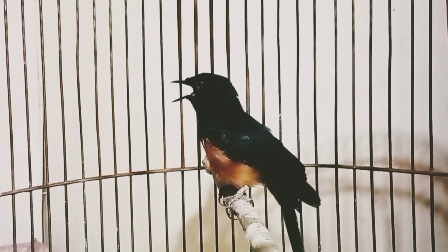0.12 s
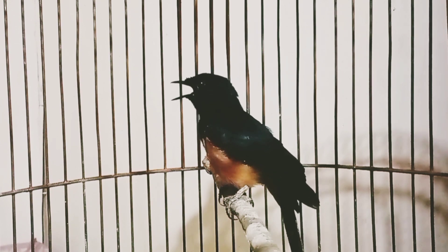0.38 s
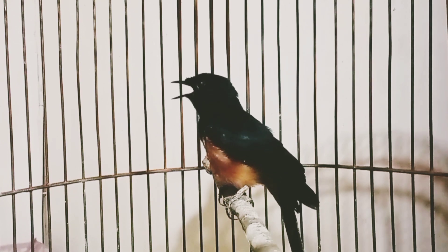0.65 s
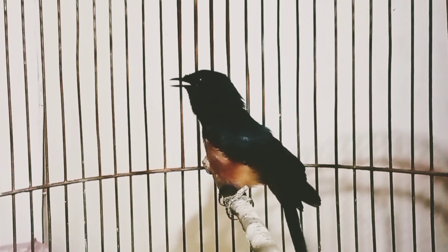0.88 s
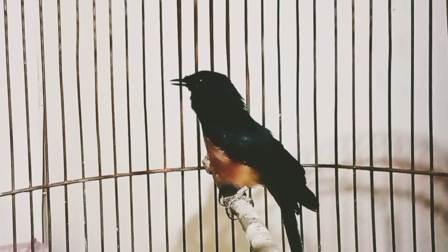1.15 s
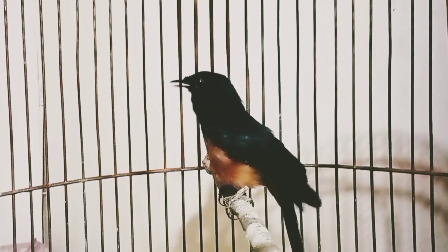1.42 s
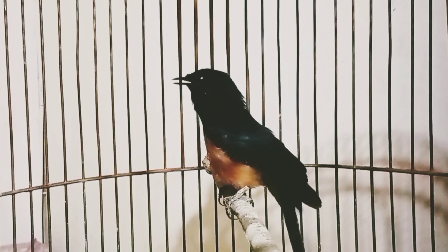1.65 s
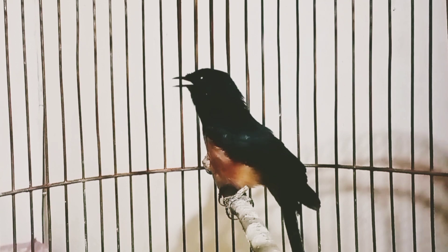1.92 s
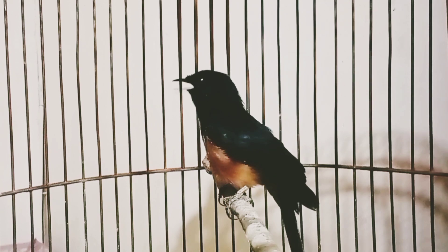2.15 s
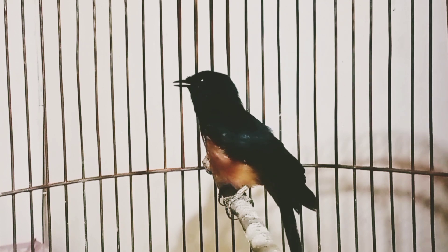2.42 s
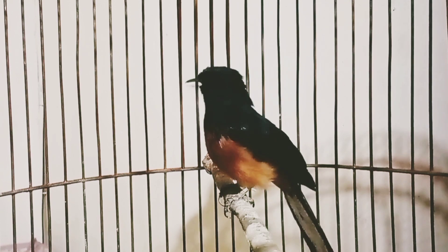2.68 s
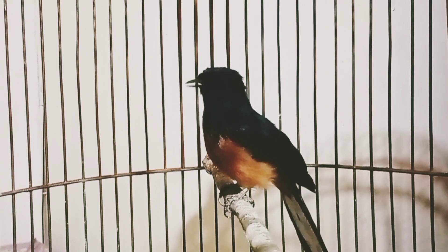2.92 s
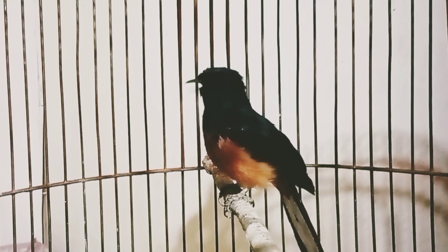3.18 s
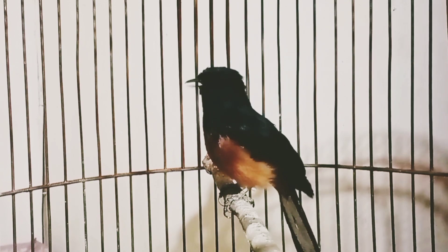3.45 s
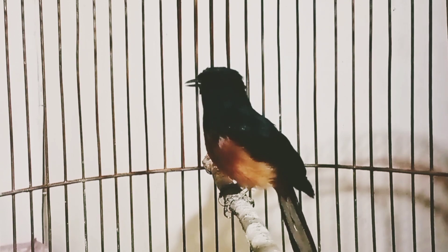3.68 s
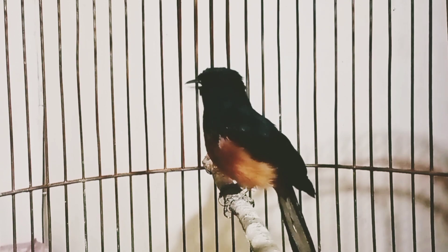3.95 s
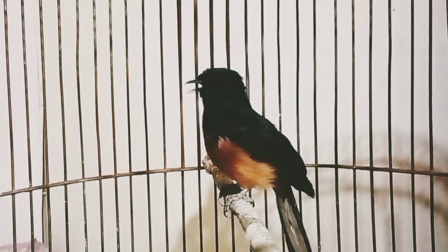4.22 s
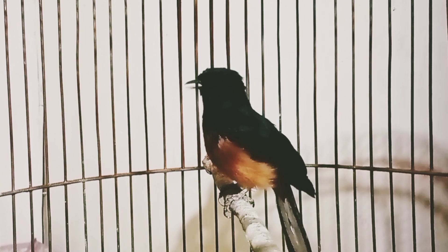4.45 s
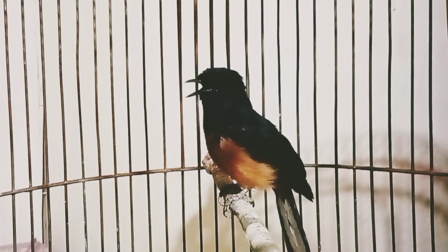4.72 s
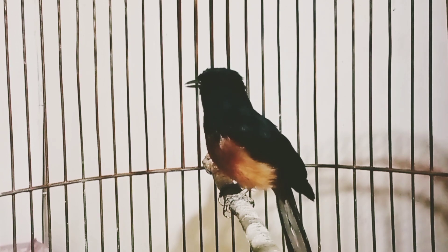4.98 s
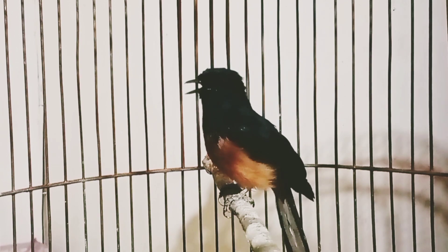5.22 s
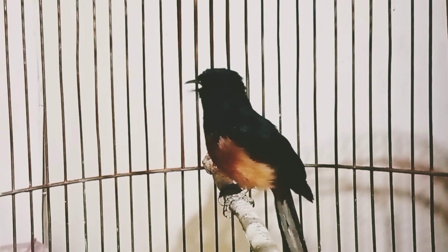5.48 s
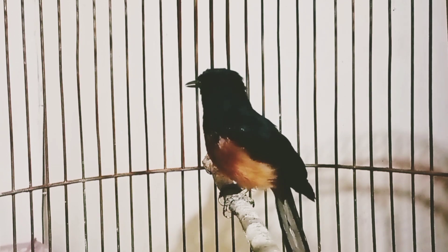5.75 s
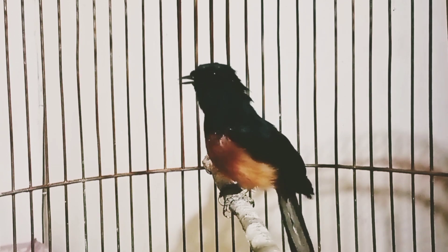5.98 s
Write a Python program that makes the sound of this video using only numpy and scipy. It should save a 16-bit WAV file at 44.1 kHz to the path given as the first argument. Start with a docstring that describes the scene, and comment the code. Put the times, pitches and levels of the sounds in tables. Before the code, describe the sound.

Close, piercing bird song with rising swoops, rattling trills and evenly repeated chips, short room echoes behind it and a faint low engine drone early on.

```python
"""Caged songbird in a hard-walled room

Whistles glide, rolls warble and a run of short chips follows, close to a stereo port pair. Notes are
near sines with coloured, raspy overtones and air. Echoes and decaying taps make the room; thin
far calls, shaped noise and a resonated engine drone lie underneath."""
import sys
import numpy as np
from scipy import signal
from scipy.fft import rfft, irfft, next_fast_len
from scipy.io import wavfile
from scipy.ndimage import uniform_filter1d, minimum_filter1d

SR = 44100
rng = np.random.default_rng(int(sys.argv[2]) if len(sys.argv) > 2 else 0)


def transcribe(signal):
    """Save signal, clipped to [-1, 1], as a 16-bit WAV file at the path in sys.argv[1]."""
    frames = np.atleast_2d(signal).T
    limited = np.clip(frames, -1, 1)
    pcm = np.round(limited * 32767).astype(np.int16)
    wavfile.write(sys.argv[1], SR, pcm)


def field_ratio(decibels):
    """Amplitude ratio for a level in dB (20 dB per decade); scalars and array-likes work."""
    return 10 ** (np.asarray(decibels, dtype=float) / 20)


N = 269892  # samples

# throat gain over chips and arches, favouring their upper part: f/Hz, gain/dB
CHIP_THROAT = [(1500, -21), (2150, -16), (2500, -12), (2880, 0), (3600, 2)]


def evened(x):
    """Scales to unit rms."""
    return x / np.sqrt(np.mean(x ** 2) + 1e-20)


def read(points, hz):
    """Interpolates a table over log frequency."""
    f, value = np.transpose(points)
    return np.interp(np.log(hz + 1), np.log(f + 1), value)


def columns(rows):
    """Start time, then every further column interpolated to samples."""
    s, *rest = np.transpose(rows)
    t = np.arange(s[0], s[-1], 1 / SR)
    return [max(s[0], 0)] + [np.interp(t, s, c) for c in rest]


def sing(mix, start_s, hz, db, throb_db, overtones):
    """Adds a near sine with overtones and air; fast glides let more air through and roughen overtones."""
    # colour of overtones, throat resonance near 2900 Hz, microphone peak near 10 kHz: f/Hz, gain/dB
    overtone_colour = [(2000, -4), (2900, 4.5), (4000, 1.5), (6200, -11), (8200, -0.5), (10000, 10),
                       (12000, -10), (15000, -13)]
    breath_db, rasp_share = -48.5, 0.33  # on a steady note, before smoothing of the noises
    slew_air_db, slew_hz_per_s, edge_s = 31, 278000, 0.003
    second_db, third_db, high_db = overtones  # re the note, before the colour

    jitter, rough, air = rng.standard_normal((len(hz), 3)).T
    jittered_hz = hz * (1 + 0.039 * uniform_filter1d(jitter, 90))
    phase = 2 * np.pi * np.cumsum(jittered_hz) / SR
    slew = np.tanh(uniform_filter1d(abs(np.gradient(hz)) * SR, 400) / slew_hz_per_s)

    breath = field_ratio(breath_db + slew_air_db * slew) * uniform_filter1d(air, size=3)
    note = field_ratio(-throb_db) * (np.sin(phase) + breath)
    rasp = 1 - slew + (rasp_share + slew) * evened(uniform_filter1d(rough, 20))
    for k, over_db in enumerate([second_db, third_db] + [high_db] * 12, start=2):
        below_nyquist = k * hz < SR / 2
        gain = field_ratio(over_db + read(overtone_colour, k * hz)) * below_nyquist
        note += rasp * gain * np.sin(k * phase + k * k)

    i = np.arange(len(hz))
    edge = np.minimum(np.minimum(i, i[::-1]) / (edge_s * SR), 1)
    note = field_ratio(db) * np.sin(np.pi / 2 * edge) ** 2 * note
    part = mix[round(start_s * SR):][:len(hz)]
    part += note[:len(part)]


def whistles():
    """Freely shaped pitch and level glides."""
    # whistles: overtones (second, third, higher)/dB re note before colour; rows t/s, f/Hz, level/dB
    whistle_rows = [
        [(-19.5, -24, -24), [(.268, 3360, -39), (.28, 2924, -3), (.292, 2627, -3.5), (.31, 2796, -10.5),
         (.327, 2853, 1), (.348, 2850, -53.5)]],
        [(0, -18, -32), [(1.438, 932, -32.5), (1.47, 1012, -17.5), (1.495, 965, -19.5), (1.51, 800, -23.5)]],
        [(-13.5, -45, -34), [(1.614, 1135, -27), (1.625, 1149, -11), (1.655, 1129, -7), (1.665, 1324, -9)]],
        [(-21, -31, -40.5), [(2.6, 1168, -54), (2.63, 1275, -40), (2.67, 1328, -30), (2.71, 1298, -24),
         (2.758, 1232, -35), (2.795, 1827, -54)]],
        [(-21.5, -32.5, -31), [(4.598, 2770, -10), (4.65, 2900, -12), (4.712, 2957, -6), (4.722, 2725, -9.5),
         (4.8, 2776, -5.5), (4.845, 2604, -6.5), (4.866, 2925, 0.5), (4.882, 2917, -3.5), (4.89, 3090, -9),
         (4.906, 3260, 2)]],
        [(-22, -33, -38), [(5.306, 2710, -11), (5.385, 2805, -10.5), (5.41, 2722, -12), (5.47, 2595, -12.5),
         (5.51, 2780, -6.5), (5.53, 3117, -4.5), (5.548, 3394, 1), (5.56, 3560, -11), (5.57, 3110, -9)]],
        [(-31, -22.5, -26.5), [(6.037, 1187, -43), (6.06, 1323, -26), (6.08, 1677, 1.5), (6.1, 1615, -4),
         (6.119, 1180, -17)]],
    ]
    out = np.zeros(N)
    for overtones, rows in whistle_rows:
        start_s, hz, db = columns(rows)
        sing(out, start_s, uniform_filter1d(hz, 120, mode="nearest"), db, 0, overtones)
    return out


def rolls():
    """Open on a pure tone, then warble; loudest at the top of each warble, where the throat rings."""
    # rolls: (full swing/share of pitch, full throb/dB, time to reach them/s);
    # rows t/s, centre f/Hz, peak level/dB, warble rate/Hz
    roll_rows = [ ((0.19, 21.2, .17), [(.946, 1650, -34, 76), (.962, 2060, -19, 77), (1.0, 1969, -5, 77),
                 (1.04, 1759, -6, 67.9), (1.09, 1644, -11, 59.5), (1.13, 1556, -10, 70.8),
                 (1.19, 1469, 0, 68.2), (1.24, 1384, -5, 55), (1.3, 1090, -14, 54.7), (1.335, 950, -20, 46),
                 (1.38, 780, -34, 42)]), ((0.079, 15, 0.046), [(1.665, 1827, 9, 109),
                 (1.685, 1957, -1.5, 72), (1.71, 1683, -13, 62), (1.76, 1547, -15.5, 48)]),
                 ((0.14, 18.6, .012), [(1.837, 1130, -29.5, 76), (1.855, 1453, -5.5, 86),
                 (1.88, 1575, 7.5, 84), (1.918, 1595, -19, 93)]), ]
    pure_s = 0.012
    out = np.zeros(N)
    for (swing, throb_db, onset_s), rows in roll_rows:
        start_s, hz, db, rate_hz = columns(rows)
        t = np.arange(len(hz)) / SR
        grown = np.clip((t - pure_s) / onset_s, 0, 1)
        warble = np.cos(2 * np.pi * np.cumsum(rate_hz) / SR)
        warbled_hz = hz * (1 + swing * grown ** .5 * warble)
        throb = throb_db * grown * (1 - warble) / 2
        sing(out, start_s, warbled_hz, db, throb, (-29.5, -35, -28.5))
    return out


def chips():
    """Pitch climbs to a crest and falls with warbled dips; lazier (longer) chips move less and are duller."""
    # chips: crest t/s, level before throat/dB, crest f/Hz, fall time/s, warble period/s
    chip_rows = [(2.809, -2, 3410, 0.024, 0.0093), (2.951, -2, 3517, 0.023, 0.0078),
                 (3.071, -2.5, 3523, 0.024, 0.0082), (3.178, -0.5, 3657, 0.021, 0.0077),
                 (3.285, -2, 3740, 0.024, 0.0087), (3.394, -3, 3684, 0.023, 0.0091),
                 (3.502, -5.5, 3640, .027, .0105), (3.611, -3, 3644, 0.026, 0.0098),
                 (3.721, -1.5, 3460, 0.028, 0.0084), (3.836, -3, 3734, 0.025, 0.0089),
                 (3.947, -1.5, 3550, 0.026, 0.0079), (4.059, -6.5, 3690, 0.028, 0.012),
                 (4.202, -8, 3547, 0.033, 0.007), (4.344, -4.5, 3480, 0.033, 0.0086)]
    usual_fall_s, laziness, rise_share = 0.027, 1.3, 0.46  # rise time as a share of the fall
    climb_hz, dip_hz, end_hz = 1800, 800, 2190  # climb and dip of a chip of usual length
    rise_db, throb_db, dull_db = 24, 9, 14
    out = np.zeros(N)
    for crest_s, db, crest_hz, fall_s, period_s in chip_rows:
        rise_s = rise_share * fall_s
        keen = (usual_fall_s / fall_s) ** laziness
        t = np.arange(-rise_s, fall_s, 1 / SR)
        up, down = np.maximum(-t / rise_s, 0), np.maximum(t / fall_s, 0)
        warble = np.sin(np.pi * t / period_s) ** 2 * (1 - down) * (t > 0)
        climb = climb_hz * keen * up ** 1.5
        fall = (crest_hz - end_hz) * np.sin(np.pi / 2 * down) ** 2
        hz = crest_hz - climb - fall - dip_hz * keen * warble
        level_db = db + read(CHIP_THROAT, hz) - rise_db * up ** 2
        overtones = np.array((-12.5, -30, -30.5)) - dull_db * (1 - keen)
        sing(out, crest_s - rise_s, hz, level_db, throb_db * warble, overtones)
    return out


def plain_notes():
    """Straight pitch glides that swell to a crest and die; one stands for a reverb tail."""
    # plain notes; the second row is the room's fading tail of a note sung before the start:
    # start t/s, length/s, from f/Hz, to f/Hz, peak level/dB, crest position/share of length
    plain_rows = [(0, 0.031, 2110, 2222, -9.5, 0.95), (0, 0.019, 2990, 2850, -16.5, 0.21),
                  (0.017, 0.083, 2623, 2664, -5, 0.98), (0.175, .068, 3045, 3406, -0.5, 0.78),
                  (0.233, 0.042, 2087, 2300, -21, 1), (2.295, 0.04, 2820, 2944, -4.5, 0.31),
                  (2.336, .048, 2048, 2310, -17.5, 0.67), (2.371, .081, 2596, 2702, -11.5, 0.57)]
    fade_in_db, fade_out_db = 19.5, 9.5
    out = np.zeros(N)
    for start_s, length_s, from_hz, to_hz, db, crest in plain_rows:
        u = np.arange(0, length_s, 1 / SR) / length_s
        crest = np.clip(crest, .05, .95)
        swell_db = fade_in_db * (1 - u / crest) ** 2
        dying_db = fade_out_db * ((u - crest) / (1 - crest)) ** 2
        fade_db = np.where(u < crest, swell_db, dying_db)
        hz = from_hz + (to_hz - from_hz) * u
        sing(out, max(start_s, 0), hz, db - fade_db, 0, (-25.5, -28, -38))
    return out


def glide(rows, bend, in_db, in_share, overtones):
    """Rising glides: pitch follows a power of time; level swells, then follows the throat."""
    # throat gain on a rising glide: f/Hz, gain/dB
    glide_throat = [(1000, -12), (1480, -13), (1620, .5), (2000, -3), (2130, -9), (2300, -1), (3300, .5),
                    (3700, -5), (4100, 1.5), (4230, -9), (4500, -11)]
    out = np.zeros(N)
    for start_s, length_s, from_hz, to_hz, db in rows:
        u = np.arange(0, length_s, 1 / SR) / length_s
        hz = from_hz + (to_hz - from_hz) * u ** bend
        swell_db = in_db * np.maximum(1 - u / in_share, 0) ** 2
        sing(out, start_s, hz, db + read(glide_throat, hz) - swell_db, 0, overtones)
    return out


def swoops_and_sweeps():
    """High swoops climb ever faster; low sweeps climb almost straight."""
    # high swoops: start t/s, length/s, from f/Hz, to f/Hz, level before throat/dB
    swoops = [(.432, .12, 3147, 4660, -0.5), (.68, 0.14, 3326, 4454, -3.5)]
    # low sweeps: start t/s, length/s, from f/Hz, to f/Hz, level before throat/dB
    sweeps = [(1.966, .041, 1052, 2060, -1), (2.078, .042, 1034, 2372, 0), (2.153, .05, 1147, 2474, -12.5)]
    return (glide(swoops, bend=2.2, in_db=19, in_share=0.46, overtones=(-16.5, -28.5, -31))
            + glide(sweeps, bend=1.1, in_db=15, in_share=0.29, overtones=(-26.5, -22.5, -22)))


def arch(rows, shape, overtones):
    """Short calls: pitch bends about a rounded crest; level climbs, falls and follows the throat."""
    rise_s, fall_s, start_ratio, end_ratio, in_db, out_db = shape
    bend = 1.5  # above 1 rounds the crest
    out = np.zeros(N)
    t = np.arange(-rise_s, fall_s, 1 / SR)
    up, down = np.maximum(-t / rise_s, 0), np.maximum(t / fall_s, 0)
    climb = (1 - start_ratio) * np.sin(np.pi / 2 * up) ** bend
    fall = (1 - end_ratio) * np.sin(np.pi / 2 * down) ** bend
    for crest_s, crest_hz, db in rows:
        hz = crest_hz * (1 - climb - fall)
        level_db = db + read(CHIP_THROAT, hz) - in_db * up ** 2 - out_db * down ** 2
        smooth_hz = uniform_filter1d(hz, size=120, mode="nearest")
        sing(out, crest_s - rise_s, smooth_hz, level_db, 0, overtones)
    return out


def flicks_drops_hooks():
    """Arched calls around each long whistle: a flick before, a drop and a hook after."""
    # flicks: crest t/s, crest f/Hz, level before throat/dB
    flicks = [(4.561, 3383, -6), (5.273, 3530, -9)]
    # drops: crest t/s, crest f/Hz, level before throat/dB
    drops = [(4.964, 3992, -3.5), (5.633, 3830, -9)]
    # hooks: crest t/s, crest f/Hz, level before throat/dB
    hooks = [(5.015, 2633, -0.23), (5.679, 2690, -2)]
    # shapes: rise/s, fall/s, pitch ratio at start, at end, fade in/dB, fade out/dB
    return (arch(flicks, (.02, 0.0093, .45, 0.38, 6.7, 1.4), (-15, -42.5, -45.5))
            + arch(drops, (0.0071, 0.029, 1, 0.39, 9.6, 14), (-20.5, -23.5, -36.5))
            + arch(hooks, (0.018, 0.031, .83, .78, 2.7, 3.8), (-10, -16, -21)))


def bird():
    """The whole song: sum of all its parts."""
    return plain_notes() + whistles() + rolls() + chips() + swoops_and_sweeps() + flicks_drops_hooks()


def ports(x):
    """Direct sound off the axis of the port pair: later and weaker at the right."""
    right_lag_s, side_db = 7.2e-5, 0.5  # left up, right down by side_db
    size = next_fast_len(N)
    delay = np.exp(-2j * np.pi * np.fft.rfftfreq(size, 1 / SR) * right_lag_s)
    late = irfft(rfft(x, size) * delay, size)[:N]
    return np.array([field_ratio(side_db) * x, field_ratio(-side_db) * late])


def room(x):
    """A few near echoes, then sparse taps of random sign, each band decaying at its own speed."""
    # near echoes: t/s, left level/dB, right level/dB
    near_echoes = [(.002, -30, -24), (.0095, -20, -18), (0.0142, -15, -17)]
    # reverberation: f/Hz, t60/s
    decay = [(800, 0.56), (2000, 0.58), (4000, 0.46), (8000, 0.34), (14000, 0.78)]
    tail_db = -9.5  # energy of the left tail
    taps = np.zeros((2, SR))
    at = np.arange(500, SR - 20, 20) + rng.integers(0, 20, (2, (SR - 501) // 20))
    np.put_along_axis(taps, at, rng.choice([-1., 1.], at.shape), 1)
    hz, t, z = signal.stft(taps, SR, nperseg=256)
    decay_db = -60 * t / read(decay, hz)[:, None]
    tail = signal.istft(z * field_ratio(decay_db), SR, nperseg=256)[1]
    tail *= field_ratio(tail_db) / np.linalg.norm(tail[0])
    for s, *db in near_echoes:
        tail[:, round(s * SR)] += field_ratio(db)
    return signal.fftconvolve(x[None], tail, axes=1)[:, :N]


def far_birds():
    """Thin calls from outside: gliding tones with negligible overtones."""
    # far calls, one list a call: t/s, f/Hz, level/dB
    far_calls = [
        [(.385, 5180, -38), (.42, 5480, -21.5), (.455, 5440, -67)],
        [(5.36, 4820, -47), (5.42, 4390, -42.5), (5.48, 3380, -37)],
        [(5.975, 2370, -47), (6.03, 2780, -39.5)],
    ]
    out = np.zeros(N)
    for rows in far_calls:
        sing(out, *columns(rows), 0, (-99, -99, -99))
    return out


def resonate(x, hz, width_hz):
    """One-pole resonance of gain 1 at hz, by shifting it to zero frequency and back."""
    turn = np.exp(2j * np.pi * hz * np.arange(len(x)) / SR)
    r = np.exp(-np.pi * width_hz / SR)
    return 2 * (turn * signal.lfilter([1 - r], [1, -r], x / turn)).real


def engine_drone():
    """A far engine passing early on: noise through doubled narrow resonances."""
    # resonances: f/Hz, width of each pass/Hz, relative level/dB
    modes = [(70.5, 1.9, -1), (97.5, 8.7, 0), (167.1, 10.6, 3.5)]
    # drone level: t/s, level/dB
    passing = [(0, -55), (0.399, -45), (1.5, -43.5), (2.25, -50.5), (2.398, -58), (6.12, -59.5)]
    noise = rng.standard_normal(N)
    drone = np.zeros(N)
    for hz, width_hz, db in modes:
        tone = resonate(resonate(noise, hz, width_hz), hz, width_hz)
        drone += field_ratio(db) * evened(tone)
    return evened(drone) * field_ratio(np.interp(np.arange(N) / SR, *np.transpose(passing)))


def rumble_and_hiss():
    """Steady noise shaped in spectrum and in left-right likeness."""
    # relative noise density: f/Hz, level/dB per Hz
    density = [(25, -31.5), (60, -4), (250, -5), (700, -23), (2000, -23.5), (5000, -25), (15500, -41.5)]
    # left-right likeness: f/Hz, correlation
    likeness = [(50, 0.58), (150, 0.81), (400, 0.32), (2000, 0.18)]
    floor_db = -47.5  # rms over both channels
    frames, hz = N // 512 + 5, np.fft.rfftfreq(2048, 1 / SR)
    a, b, c, d = rng.standard_normal((frames, 1025, 4)).T
    same = np.clip(read(likeness, hz), -1, 1)[:, None]
    left, other = a + 1j * b, c + 1j * d
    right = same * left + np.sqrt(1 - same ** 2) * other
    z = np.array([left, right]) * field_ratio(read(density, hz))[:, None]
    noise = signal.istft(z, nperseg=2048, noverlap=1536)[1][:, :N]
    return field_ratio(floor_db) * evened(noise)


def scene():
    """Direct song, its room and the background."""
    song = bird() + far_birds()
    return ports(song) + room(song) + rumble_and_hiss() + engine_drone()


def top_cut(x):
    """Nothing passes above the cut-off."""
    return signal.sosfilt(signal.butter(12, 15620, fs=SR, output="sos"), x)


def record(dry):
    """A fast limiter, linked across channels, holds the loudest crests just under full scale."""
    peak = -minimum_filter1d(-abs(dry).max(0), size=128)
    crest = uniform_filter1d(peak, size=128)
    held = dry / np.maximum(crest / .98, 1)
    return top_cut(np.clip(held, -1, 1))


dry = scene()
out = record(dry)
transcribe(out)
```